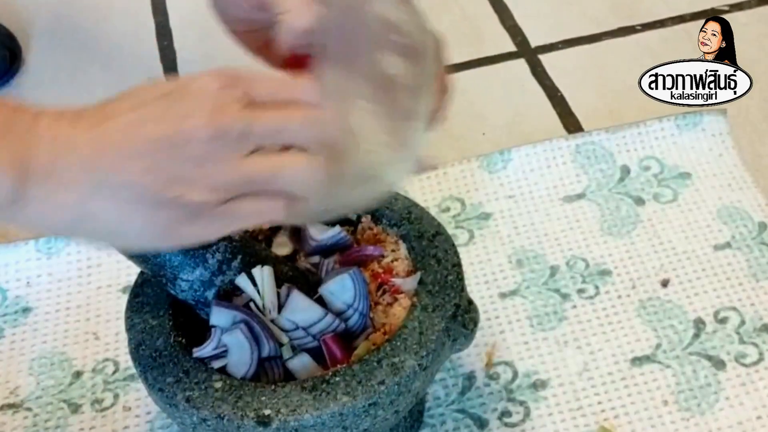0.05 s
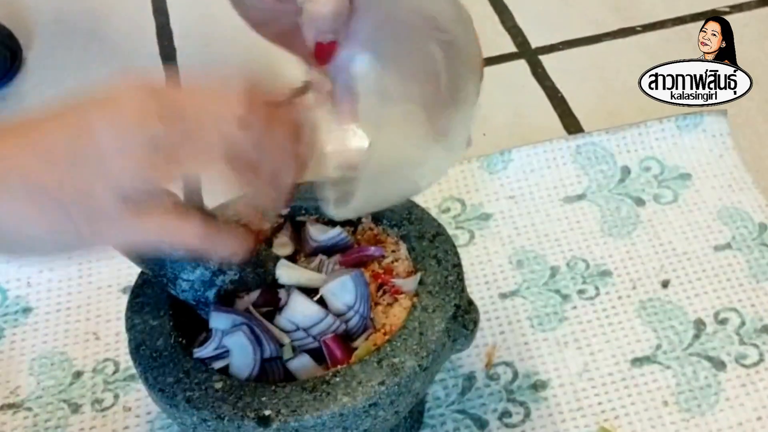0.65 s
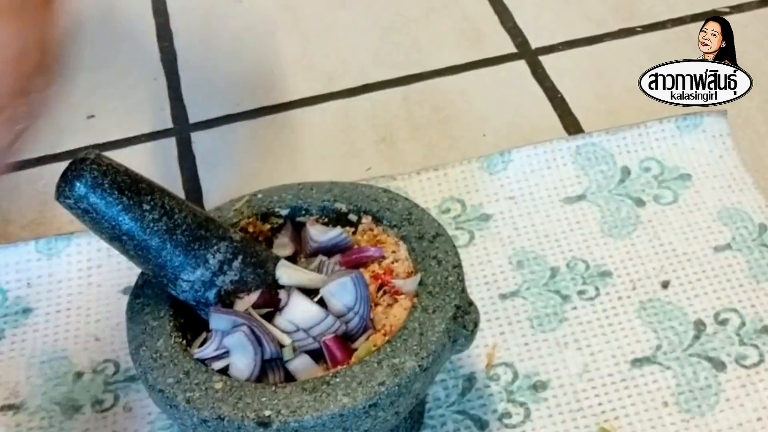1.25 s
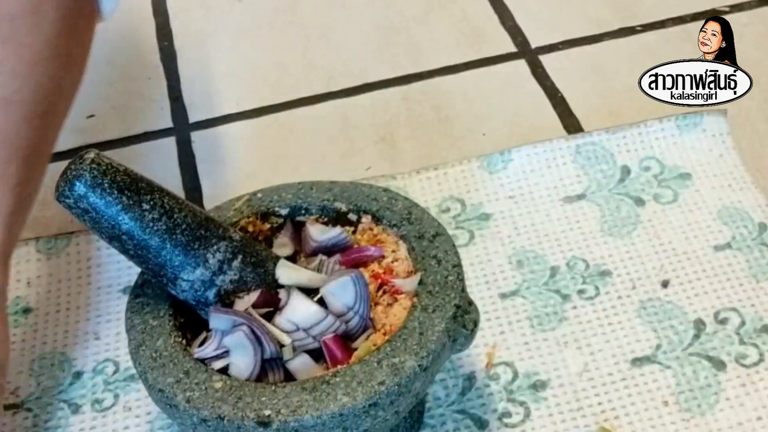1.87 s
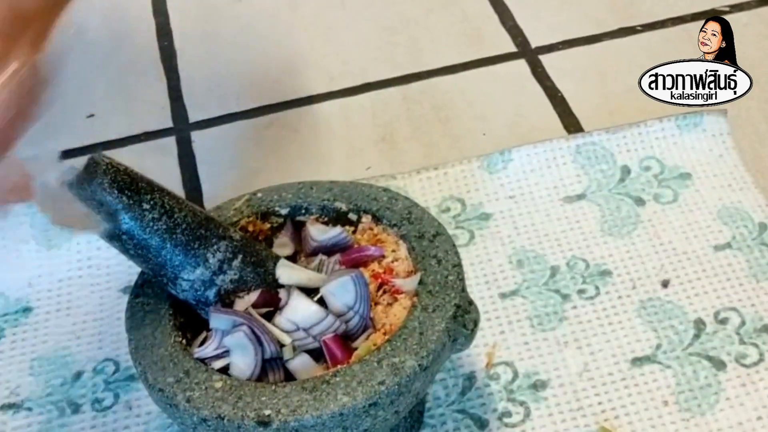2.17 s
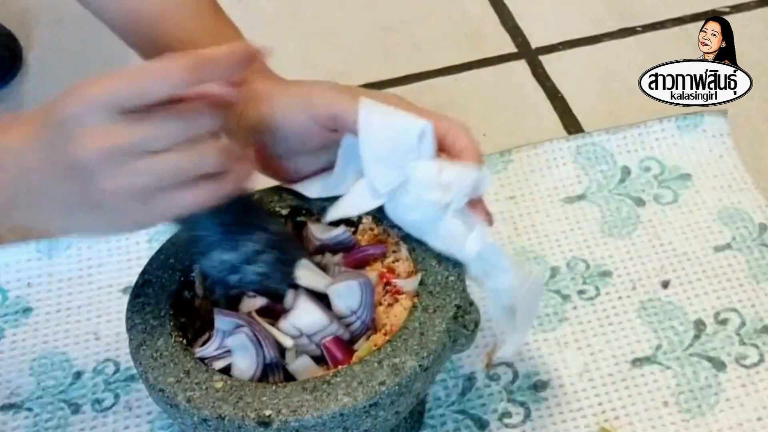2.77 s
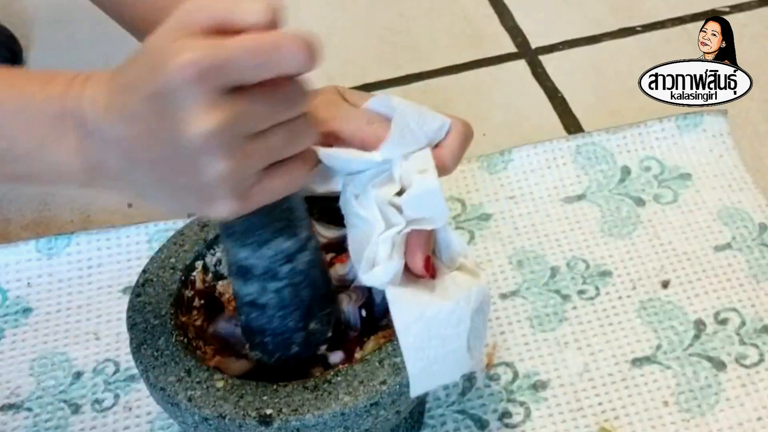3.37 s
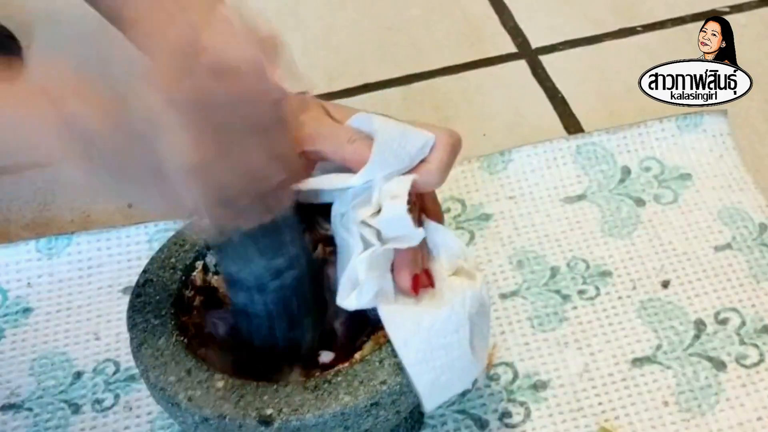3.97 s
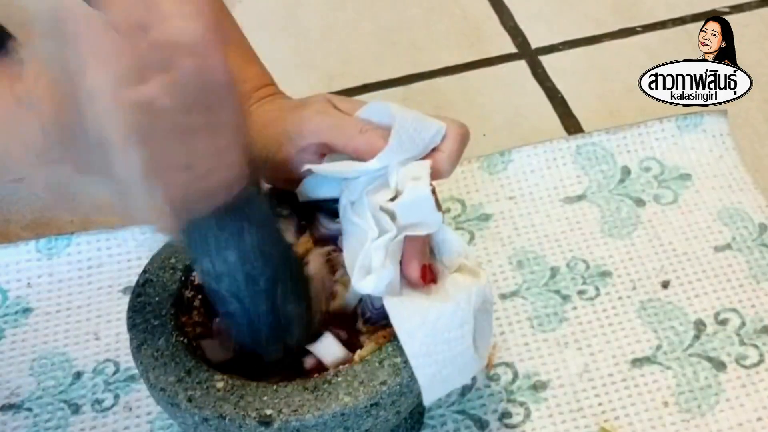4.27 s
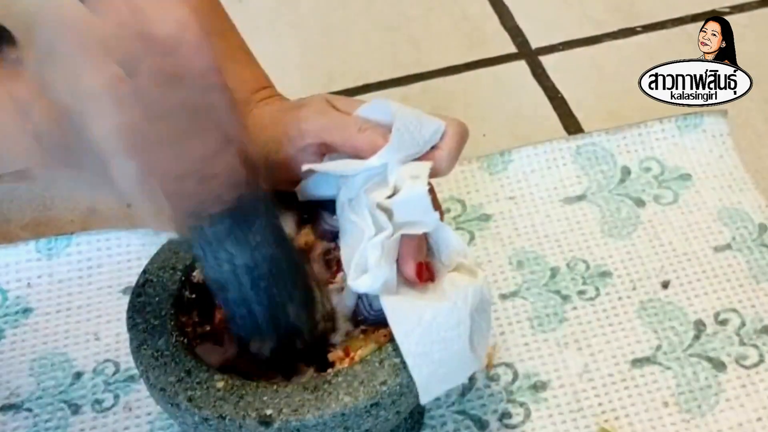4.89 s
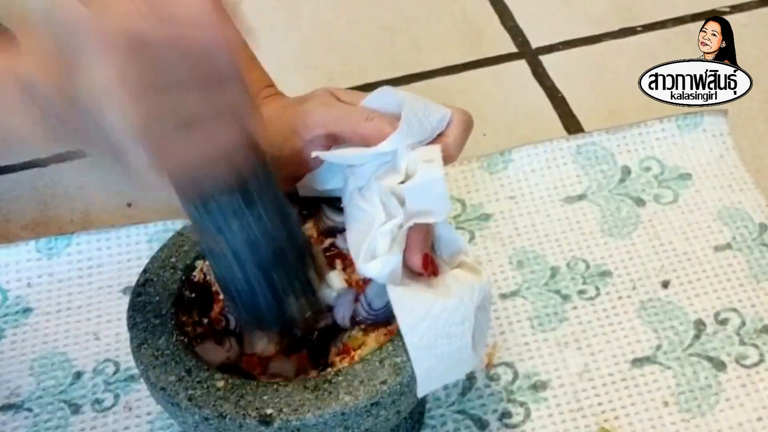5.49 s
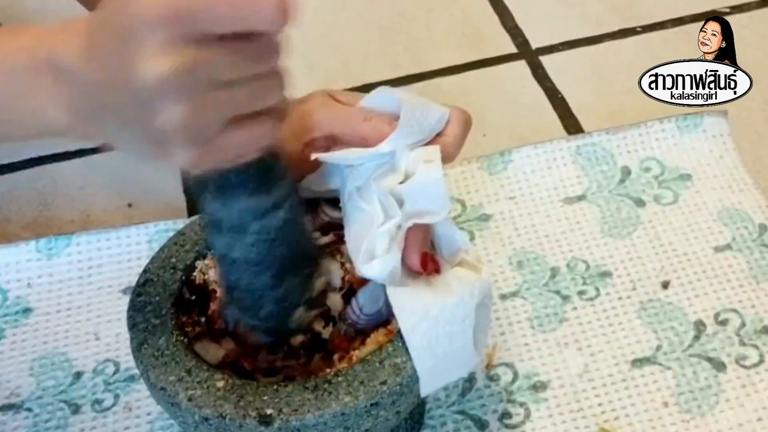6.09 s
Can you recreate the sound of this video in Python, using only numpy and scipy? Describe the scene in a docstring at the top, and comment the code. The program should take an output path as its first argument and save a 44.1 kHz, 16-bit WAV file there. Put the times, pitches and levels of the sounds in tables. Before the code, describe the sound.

After a ringing glass clank and a soft rustle, steady pestle blows in a stone mortar build from crunches to hard clacks.

```python
"""On a tiled kitchen floor, a hand sweeps onion out of a glass bowl and sets the bowl down hard.
A paper towel rustles up to the rim of a stone mortar; then the pestle pounds, three blows a second.
The first blows mostly crunch through the pieces, the later ones clack on the stone and thud into
the floor. The mortar's hollow colours the blows, and the tiled room adds a short echo."""
import sys
import numpy as np
from scipy import signal
from scipy.fft import rfft, irfft, next_fast_len
from scipy.io import wavfile
from scipy.ndimage import uniform_filter1d

SR = 44100
rng = np.random.default_rng(int(sys.argv[2]) if len(sys.argv) > 2 else 0)


def to_wav(sig):
    """Store sig (one row per channel, or 1-D mono) as 16-bit WAV at the path in sys.argv[1].

    Samples outside -1..1 are clipped; the rate is SR.
    """
    pcm = np.clip(np.atleast_2d(sig), -1, 1) * 32767
    pcm = np.round(pcm).astype(np.int16)
    wavfile.write(sys.argv[1], SR, pcm.T)  # frames by channels


N = 275164
EVENT_TIME = np.arange(-SR // 5, SR // 2) / SR  # seconds around one event, which peaks at 0


# The mortar's hollow. Each row: pitch in Hz, width in Hz, relative level in dB.
MORTAR_RESONANCES = [(432, 53, -4.5), (890, 155, -1), (1417, 195, 1), (1800, 330, 0.5), (2680, 740, -1),
                     (3775, 520, 0.5), (5280, 570, -4.5), (6280, 800, -7), (7850, 1770, -15.5),
                     (12360, 2600, -20)]
# The blows. Each row: landing time in seconds, relative levels of clack, crunch and thud in dB,
# seconds from first touch to landing, crunch rise in seconds, levels of pop and squelch in dB.
PESTLE_BLOWS = [(3.669, -28.5, -27, -46.5, 0.012, .013, -25, -40),
                (4.006, -55, -29.5, -45, 0.023, 0.021, -25.5, -47),
                (4.324, -50, -33, -46.5, 0.034, 0.04, -55, -29.5),
                (4.6307, -32, -31.5, -56.5, .028, 0.019, -38, -23.5),
                (4.939, -26, -25.5, -39.5, .012, 0.011, -31, -25),
                (5.2519, -17, -26.5, -29, 0.021, 0.0094, -35, -34),
                (5.5611, -21.5, -29.5, -32.5, 0.014, 0.019, -30.5, -28),
                (5.8782, -15.5, -25.5, -30.5, .028, 0.019, -33, -16),
                (6.2127, -12, -25.5, -31, 0.017, 0.017, -44, -10)]

def pestle():
    """Each blow pops a piece, crushes the onion and meets stone; the mortar's hollow colours it."""
    out = np.zeros(N)
    for start, clack_db, crunch_db, _, lead, rise, pop_db, squelch_db in PESTLE_BLOWS:
        touching = EVENT_TIME > -lead
        crunch = amp(crunch_db) * swell(rise, fall=0.019) * touching * grit(spread_db=4.5)
        clack_hz = 3500 * 2 ** ((clack_db + 22) / 11)  # 11 dB harder is an octave brighter
        clack = amp(clack_db - 2.5) * band(contact(rise=0.002, fall=0.0033), clack_hz, octaves=2.04)
        # The hollow's levels and pitches vary a little from blow to blow.
        modes = [(hz, width, db + rng.normal(0, 1.5)) for hz, width, db in MORTAR_RESONANCES]
        blow = resonate(crunch + clack, modes, lower_by=np.exp(rng.normal(0, 0.026)))
        add(out, start, blow + amp(-7) * echo(blow, gap=0.008))
        add(out, start - lead, onion_pop(pop_db, hz=997))
        add(out, start, onion_pop(squelch_db, hz=1085))
    return out


def onion_pop(db, hz):
    """A piece bursts: two short tones near the given pitch, and their echo."""
    hz = hz * np.exp(rng.normal(0, 0.044))
    burst = amp(db) * ring([(hz, 0, 0.018), (hz * 1.13, -7, 0.012)], attack=0.0014)
    return burst + amp(-9) * echo(burst)


# The floor's low notes. Each row: pitch in Hz, relative level in dB, seconds to fade by 60 dB.
FLOOR_TONES = [(133.7, 2.5, 0.063), (142.6, -8.5, 0.077), (226, -4, 0.047)]
# The thud and its bounces off the walls. Each row: delay in seconds, relative level in dB.
THUD_ARRIVALS = [(0, -8.5), (.018, 0), (0.043, -3.5), (.049, -2.5), (.089, -11.5)]

def floor_thud():
    """At each blow the heavy mortar pushes the floor; the boom builds as the walls return it."""
    out = np.zeros(N)
    push = ring(FLOOR_TONES, attack=0.00029)
    for start, _, _, thud_db, *_ in PESTLE_BLOWS:
        for delay, arrival_db in THUD_ARRIVALS:
            add(out, start + delay, amp(thud_db + arrival_db) * push)
        add(out, start, amp(thud_db - 7.5) * echo(push, gap=0.03))
    return out


# The tone colour of glass hitting tile. Each row: frequency in Hz, relative level in dB.
CLASH_SPECTRUM = [(80, -35.5), (150, -5), (300, -8.5), (600, 6), (1000, -0.5), (3600, 3.5), (4100, -8.5),
                  (4400, -5.5), (5200, 4), (6000, -21.5), (7000, -14), (8100, -15.5), (10400, -18),
                  (14500, -38.5)]
# The bowl's ring, damped by the tile. Each row: pitch in Hz, width in Hz, relative level in dB.
DAMPED_BOWL_RESONANCES = [(4394, 120, 0.5), (5250, 150, 1.5), (6780, 130, -2), (7420, 210, -8),
                          (8600, 93, -22.5), (9370, 138, -7), (9720, 100, -17.5), (12800, 260, -19)]
# Bowl and tile ringing together. Each row: pitch in Hz, relative level in dB, seconds to fade by 60 dB.
BOWL_AND_TILE_TONES = [(500, 0, .26), (639, -5, .3), (706, -10, .22), (755, -8, .24), (791, -5, .24),
                       (1305, -4, .24), (1803, -9, .26), (2216, -8, .26), (2585, -9, .26), (3601, -4, .28),
                       (4348, -6, .28), (4409, -7, .28), (4999, -7, .3), (5177, -9, .28), (6712, -11, .3),
                       (6811, -9, .3), (7447, -16, .28), (8468, -26, .3), (9408, -16, .28),
                       (9734, -20, .27), (12850, -24, .22)]

def bowl_set_down():
    """The bowl hits the tile and rings; it is heard mostly through the room's echo."""
    out = np.zeros(N)
    hit = contact(rise=0.00097, fall=0.013)
    clash = amp(-12.5) * filtered(hit, lambda hz: amp(value_at(CLASH_SPECTRUM, hz)))
    clash += amp(-19.5) * resonate(hit, DAMPED_BOWL_RESONANCES)
    ringing = amp(-20.5) * ring(BOWL_AND_TILE_TONES, attack=0.013)
    add(out, 2.012, clash + amp(7) * echo(clash, gap=0.0026) + ringing)
    return out


# The glass bowl's own notes. Each row: pitch in Hz, width in Hz, relative level in dB.
BOWL_RESONANCES = [(1167, 80, -4), (2510, 32, 0.5), (4350, 120, -5.5), (6660, 115, 0.5), (9460, 82, -19),
                   (12800, 120, -20)]
# Fingers on glass. Each row: peak time in seconds, ring and scrape levels in dB, rise and fall in seconds.
FINGER_SWEEPS = [(0.103, -56.5, -55.5, 0.17, 0.03), (.117, -44, -64, 0.012, 0.0043),
                 (0.427, -38.5, -37.5, 0.0017, 0.0085), (0.501, -48.5, -54, 0.057, 0.022),
                 (0.507, -35.5, -54, 0.0032, 0.0072), (0.846, -54.5, -55.5, 0.012, 0.047)]

def fingers_in_bowl():
    """Fingers sweep the pieces out, and their rubbing makes the glass sing."""
    out = np.zeros(N)
    for peak, ring_db, scrape_db, rise, fall in FINGER_SWEEPS:
        rub = swell(rise, fall) * grit(spread_db=3.5)
        singing = amp(ring_db) * resonate(rub, BOWL_RESONANCES)
        scrape = amp(scrape_db) * band(rub, centre_hz=1270, octaves=3.1)
        sweep = singing + scrape
        add(out, peak, sweep + amp(-5) * echo(sweep))
    return out


# Knocks. Each row: time in seconds, level in dB, pitch in Hz, width in octaves, relative echo in dB.
HANDLING_KNOCKS = [(.184, -49, 2900, 0.32, -5), (.571, -45, 3300, 1.04, -2), (.843, -32, 10700, 1.7, -13),
                   (1.502, -52, 2950, 1.1, -1), (1.607, -49.5, 3940, 1, -24), (1.644, -36, 251, 1.6, -13),
                   (1.654, -33.5, 2900, 0.8, -9), (1.866, -34, 2920, 0.57, -1.5),
                   (2.29, -48.5, 4940, 0.46, 0.5), (2.395, -37.5, 1480, 0.38, -2.5),
                   (2.64, -38, 430, 1.9, -0.5), (3.245, -49.5, 3300, 0.96, 6.5),
                   (3.557, -56, 3450, 0.93, -13), (5.832, -48.5, 2740, .4, -2)]

def small_knocks():
    """Things tick and knock as they are handled; lower knocks last longer."""
    out = np.zeros(N)
    for start, db, hz, octaves, echo_db in HANDLING_KNOCKS:
        fall = 0.0086 * (3000 / hz) ** 0.71
        knock = amp(db) * band(contact(rise=0.00066, fall=fall), hz, octaves)
        add(out, start, knock + amp(echo_db) * echo(knock))
    return out


# The mortar's slips. Each row: peak time in seconds, level in dB, pitch in Hz, width in octaves,
# rise and fall in seconds.
MORTAR_SHIFTS = [(4.122, -45.5, 397, 0.41, 0.036, 0.065), (4.167, -55, 900, 0.72, 0.034, 0.052),
                 (4.205, -50, 119, 0.37, 0.13, 0.078)]

def mortar_shifting():
    """Between two blows the mortar shifts on its cloth with a hollow rub."""
    out = np.zeros(N)
    for peak, db, hz, octaves, rise, fall in MORTAR_SHIFTS:
        rub = amp(db) * swell(rise, fall) * unit(band(grit(spread_db=-0.5), hz, octaves))
        add(out, peak, rub + amp(-3.5) * echo(rub))
    return out


# The rustle's low swish and its high hiss. Each row: frequency in Hz, relative level in dB.
SWISH_SPECTRUM = [(60, -23), (160, -7), (400, -4), (1050, 2.5), (2200, -1), (3200, -16), (6000, -49)]
HISS_SPECTRUM = [(1200, -49.5), (2500, -3), (3500, -3.5), (5800, -8.5), (8000, -19), (13300, -25.5),
                 (14200, -55)]
# Strokes of arm and towel. Each row: peak time in seconds, swish level in dB,
# hiss level in dB above the swish, rise and fall in seconds.
TOWEL_STROKES = [(1.27, -65.5, 8, 0.53, 0.22), (1.42, -60, -11, 0.56, 0.24), (1.665, -48, .5, 0.074, 0.31),
                 (1.844, -48, -2.5, 0.092, 0.2), (2.56, -54, -4, 0.49, 0.3), (2.67, -52, -1.5, 0.057, 0.19),
                 (2.86, -52.5, 1, 0.2, 0.34), (3.01, -54.5, -5, 0.16, 0.21),
                 (3.309, -48.5, 3, 0.076, 0.089), (3.4, -63.5, -5, 0.11, 0.69)]

def towel_rustle():
    """The arm reaches aside and comes back with the paper towel: every stroke swells and fades."""
    swish_power, hiss_power = np.zeros(N), np.zeros(N)
    for peak, db, hiss_db, rise, fall in TOWEL_STROKES:
        stroke = amp(db) * swell(rise, fall, t=np.arange(N) / SR - peak)
        swish_power += stroke ** 2
        hiss_power += (amp(hiss_db) * stroke) ** 2
    swish = np.sqrt(swish_power) * noise(SWISH_SPECTRUM, spread_db=0.5)
    hiss = np.sqrt(hiss_power) * noise(HISS_SPECTRUM, spread_db=2)
    return swish + hiss


# How long the kitchen echoes. Each row: frequency in Hz, seconds to fade by 60 dB.
ECHO_FADE_TIMES = [(120, 0.56), (500, 0.39), (2000, 0.38), (5000, 0.33), (9000, 0.36), (14000, 0.29)]

def echo(x, gap=0.0052):
    """The tiled room answers after gap seconds with a blur of reflections, about as strong as x."""
    hz, t, spectrum = signal.stft(rng.standard_normal(SR // 2), SR, nperseg=256)
    fade = amp(-60 * t / value_at(ECHO_FADE_TIMES, hz)[:, None])
    _, tail = signal.istft(spectrum * fade, SR, nperseg=256)
    tail = np.pad(tail, (round(gap * SR), 0))
    return signal.fftconvolve(x, tail / np.linalg.norm(tail))[:len(x)]


# The tone colour of the quiet room. Each row: frequency in Hz, relative level in dB.
AIR_SPECTRUM = [(15, -64), (25, -6), (150, -2.5), (342, -5), (498, -2), (554, -5), (826, -6.5),
                (1080, -8.5), (1410, -8.5), (1790, -16), (1940, -10), (6290, -19), (13300, -21),
                (14800, -30.5)]

def room_air():
    """A faint, steady rush lies under everything."""
    return amp(-66) * noise(AIR_SPECTRUM, spread_db=1.5)


def amp(db):
    """Turn decibels into a factor to multiply by."""
    return 10 ** (np.asarray(db) / 20)


def unit(x):
    """Scale x to an average power of 1."""
    return x / np.sqrt(np.mean(x ** 2) + 1e-20)


def value_at(points, hz):
    """Read between (Hz, value) points, spaced by musical pitch."""
    frequencies, values = np.transpose(points)
    return np.interp(np.log(hz + 1), np.log(frequencies + 1), values)


def filtered(x, response):
    """Turn each frequency of x up or down by response(hz)."""
    size = next_fast_len(len(x) + SR // 4)
    hz = np.fft.rfftfreq(size, 1 / SR)
    return irfft(rfft(x, size) * response(hz), size)[:len(x)]


def shaped(x, response):
    """Like filtered, but white noise keeps its power."""
    return filtered(x, lambda hz: response(hz) / np.sqrt(np.mean(abs(response(hz)) ** 2)))


def band(x, centre_hz, octaves):
    """Keep one broad hump of frequencies."""
    return shaped(x, lambda hz: (1 + (np.log2((hz + 1) / centre_hz) / octaves) ** 2) ** -1.5)


def resonate(x, modes, lower_by=1):
    """Pass x through (Hz, width, dB) resonances, their pitches divided by lower_by."""
    def response(hz):
        f = hz * lower_by
        return sum((-1) ** k * amp(db) * 1j * f * width / (pitch ** 2 - f ** 2 + 1j * f * width)
                   for k, (pitch, width, db) in enumerate(modes))
    return shaped(x, response)


def grit(spread_db, size=len(EVENT_TIME)):
    """White noise broken into millisecond grains of random strength."""
    grain = unit(uniform_filter1d(rng.standard_normal(size), size=40))
    return unit(rng.standard_normal(size) * amp(spread_db * np.clip(grain, -2, 2)))


def noise(spectrum, spread_db):
    """Grainy noise with the given tone colour, as long as the scene."""
    return shaped(grit(spread_db, size=N), lambda hz: amp(value_at(spectrum, hz)))


def swell(rise, fall, t=EVENT_TIME):
    """Grow to a peak, then fade; rise and fall are the seconds for 20 dB."""
    return amp(-20 * np.maximum(-t / rise, t / fall))


def contact(rise, fall):
    """Two hard things meet: a cluster of tiny impacts, even across frequency."""
    spectrum = rfft(rng.standard_normal(len(EVENT_TIME)) * swell(rise, fall))
    power = abs(spectrum) ** 2
    flattened = spectrum / np.sqrt(power + np.mean(power) / 10)
    hit = irfft(flattened, len(EVENT_TIME)) * (EVENT_TIME > -2 * rise)
    return hit / np.linalg.norm(hit) * np.sqrt(0.002 * SR)  # the energy of 2 ms at power 1


def ring(tones, attack):
    """A struck thing rings with fading tones; attack, in seconds, softens the start."""
    t = np.maximum(EVENT_TIME, 0)
    onset = 1 - np.exp(-t / attack)
    return onset * sum(amp(db - 60 * t / fade) * np.sin(2 * np.pi * hz * t) for hz, db, fade in tones)


def add(track, seconds, sound):
    """Mix an event in so that its time 0 falls at the given time."""
    at = round((seconds + EVENT_TIME[0]) * SR) + np.arange(len(sound))
    inside = (at >= 0) & (at < N)
    track[at[inside]] += sound[inside]


def scene():
    """Add all the sources into one channel."""
    air = room_air()
    pounding = pestle() + floor_thud()
    bowl = fingers_in_bowl() + bowl_set_down()
    handling = small_knocks() + mortar_shifting() + towel_rustle()
    return (pounding + bowl + handling + air)[None]


def record(dry):
    """The small microphone drops the deep bass, and the very highest treble is cut off."""
    bottom_hz, top_hz = 100, 14800
    bass_cut = signal.butter(4, bottom_hz, "highpass", fs=SR, output="sos")
    thin = signal.sosfilt(bass_cut, dry[0])
    return filtered(thin, lambda hz: 1 / (1 + (hz / top_hz) ** 120))[None]


dry = scene()
out = record(dry)
to_wav(out)
```